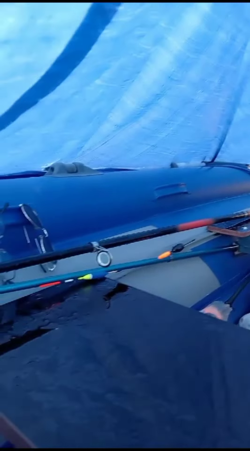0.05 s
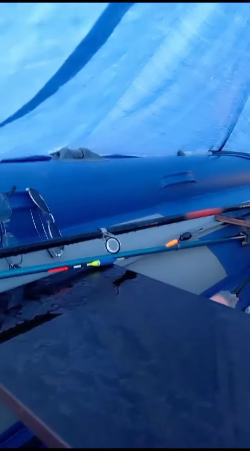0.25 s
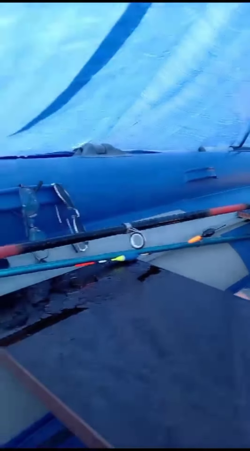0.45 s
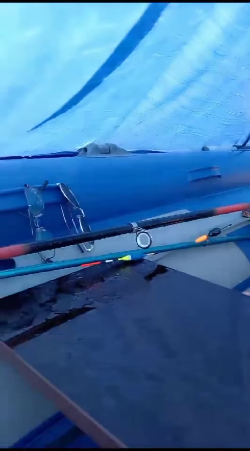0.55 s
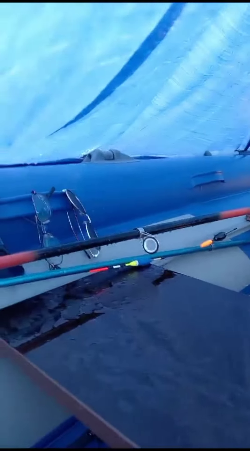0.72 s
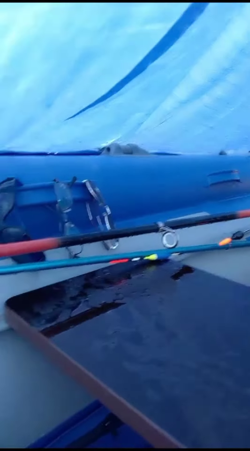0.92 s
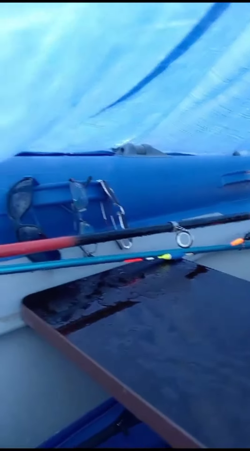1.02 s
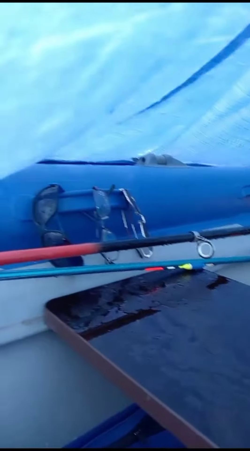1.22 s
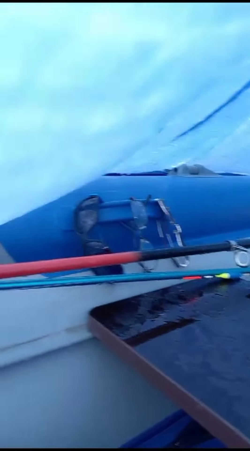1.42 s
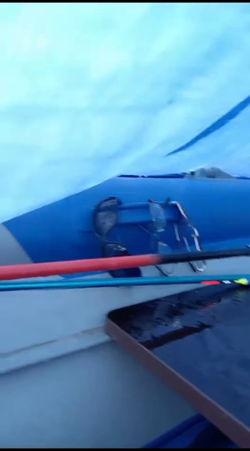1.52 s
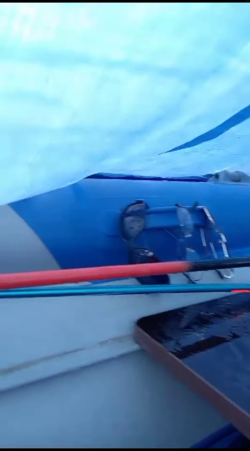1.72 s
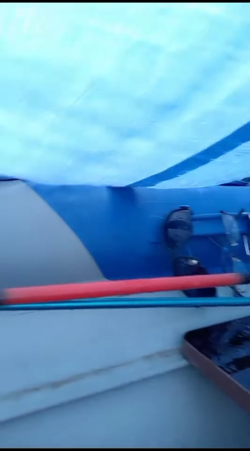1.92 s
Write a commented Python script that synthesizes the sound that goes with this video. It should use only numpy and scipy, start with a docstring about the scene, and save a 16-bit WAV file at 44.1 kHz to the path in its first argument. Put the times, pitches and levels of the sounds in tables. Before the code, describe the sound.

A tarp canopy flaps over a small boat, heard from underneath. It stirs with soft slaps, then flutters and pulls taut with a loud, low thump near 0.3 seconds. Three quick ringing blows follow around 0.4. It drums and rustles with fine rain crackle, the drumming sinking after 1 second. Creases snap near 0.85, 1.4 and 1.9 seconds, with tiny bright ticks. Faint wind and distant rain continue throughout.

```python
"""Under a tarp canopy on a small boat, with low wind and distant rain throughout. The sheet stirs with
soft slaps, then a gust fills it: it flutters and slaps taut with a low thump at 0.27 s. Three blows of
the gust set it ringing, and it drums and rustles as it shifts, fine rain crackling on the fabric.
After about 1 s the drumming sinks; the rustle goes on, with bright ticks and the sharp snaps of
creases flipping over."""
import sys
import numpy as np
from scipy import signal
from scipy.fft import rfft, irfft
from scipy.io import wavfile
from scipy.ndimage import uniform_filter1d

SR = 44100
rng = np.random.default_rng(int(sys.argv[2]) if len(sys.argv) > 2 else 0)


def dump_mix(stems):
    """Bounce the given channels to the path in sys.argv[1] as a 16-bit WAV at rate SR."""
    frames = np.atleast_2d(stems).T  # one column per channel
    limited = np.clip(frames, -1, 1)  # hard clip at full scale
    pcm = np.round(limited * 32767).astype(np.int16)
    wavfile.write(sys.argv[1], SR, pcm)


N = 85995


def undb(db):
    """Decibels to gain."""
    return 10 ** (np.asarray(db) / 20)


def unit(x):
    """Scale to rms 1."""
    return x / np.sqrt(np.mean(x ** 2) + 1e-20)


def clock():
    """Time of each sample in seconds."""
    return np.arange(N) / SR


def envelope(points):
    """Gain curve through (t/s, level/dB) points."""
    return undb(np.interp(clock(), *np.array(points).T))


def eq(x, points):
    """Minimum-phase EQ through (f/Hz, level/dB) points."""
    size = 4096
    hz, db = np.array(points, float).T
    bin_hz = np.arange(size // 2 + 1) * SR / size
    bin_db = np.interp(np.log(bin_hz + 1), np.log(hz), db)
    cepstrum = irfft(np.log(undb(bin_db)))
    cepstrum[1:size // 2] *= 2
    cepstrum[size // 2 + 1:] = 0
    impulse_response = irfft(np.exp(rfft(cepstrum)))
    return signal.fftconvolve(x, impulse_response)[:N]


def highpass(order, hz):
    """Sections of a Butterworth low cut."""
    return signal.butter(order, hz, "high", fs=SR, output="sos")


def shelf(x, hz, db):
    """Boost or cut everything above a frequency."""
    return x + (undb(db) - 1) * signal.sosfiltfilt(highpass(2, hz), x)


def band(x, hz, width_hz):
    """One resonance, gain 1 at its centre."""
    return signal.lfilter(*signal.iirpeak(hz, hz / width_hz, fs=SR), x)


def wander(rate):
    """Smooth random modulation, rms 1."""
    steps = rng.standard_normal(2000)
    return unit(np.interp(clock() * rate, np.arange(len(steps)), steps))


def patter(rate, scatter_db):
    """Tiny impacts of uneven size at random moments, about `rate` a second."""
    hits = rng.random(N) < rate / SR
    size = undb(scatter_db * np.minimum(rng.standard_normal(N), 2))
    sign = rng.choice([-1, 1], N)
    return unit(hits * sign * size)


# Slap cues, the sheet pulling taut: t/s, level/dB, f/Hz, softness/s
SLAP_CUES = [(0.017, -36, 127, 0.0025), (.036, -46, 90, .002), (.099, -43, 103, 0.0018),
             (.126, -36, 105, 0.00054), (0.138, -32.5, 121, 0.00042), (0.147, -34.5, 99, 0.0005),
             (.180, -50, 130, .0015), (0.211, -32, 79, .0015), (.236, -25, 84, 0.0033),
             (0.248, -27, 95, .0022), (0.2568, -13.5, 138, 0.00051), (0.2703, -8, 103, 0.00081),
             (0.277, -14.5, 209, 0.00028), (.2830, -12.5, 63, 0.0019), (1.173, -53, 110, 0.00074),
             (1.488, -35.5, 88.5, 0.0015)]


def slaps():
    """Pressure builds under the sheet and collapses as it cracks taut; the sheet swings once."""
    fill_cycles, swing_cycles, swing_lag_rad, crack_share = 0.6, 0.75, 0.76, 0.2
    out = np.zeros(N)
    for start, db, hz, soft_s in SLAP_CUES:
        age = clock() - start
        after = np.maximum(age, 0)
        pull = 0.5 + 0.5 * np.tanh(age / soft_s)
        crack = 1 - np.exp(-after / soft_s)
        taut = (1 - crack_share) * pull + crack_share * crack
        fill = np.exp(np.minimum(age, 0) * hz / fill_cycles)
        damping = np.exp(-(after * hz / swing_cycles) ** 2)
        swing = -damping * np.cos(2 * np.pi * hz * after - swing_lag_rad)
        thump = signal.sosfiltfilt(highpass(1, 25), (1 - taut) * fill + taut * swing)
        out += undb(db) * thump / np.abs(thump).max()
    return out


# Beat cues, the gust hitting the taut sheet: t/s, level/dB
BEAT_CUES = [(.391, -15), (.419, -20), (0.463, -35)]
# The ring of each beat: f/Hz, width/Hz, relative level/dB
BEAT_RING = [(164.3, 33, -1.5), (234.7, 43, 3), (294.6, 42, 0.5), (643, 59, -5.5), (689, 54, -11)]


def beats():
    """Single blows of the gust set the taut sheet ringing; the ring swells quickly and dies away."""
    out = np.zeros(N)
    for start, db in BEAT_CUES:
        age = np.maximum(clock() - start, 0)
        tone = np.zeros(N)
        for hz, width, mode_db in BEAT_RING:
            swell = age * width * np.exp(-np.pi * width * age)
            tone += undb(mode_db) * swell * np.sin(2 * np.pi * hz * age)
        out += undb(db) * tone / np.abs(tone).max()
    return out


def sheet_ring(impacts, modes):
    """Impacts ring the sheet's steep resonances; the wind's steady pull keeps the ringing fairly even."""
    body = np.zeros(N)
    for k, (hz, width, db) in enumerate(modes):
        staggered = np.roll(impacts, 97 * k)
        first_pass = band(staggered, hz, 1.75 * width)
        body += undb(db) * band(first_pass, hz, 1.72 * width)
    body = unit(body)
    power = uniform_filter1d(body ** 2, size=1800)
    return unit(body / np.sqrt(power + 0.22))  # gentle compression


# Envelopes of the sheet's deep billow, low drum and hollow mids: t/s, relative level/dB
BILLOW_ENVELOPE = [(0.3, -35), (0.318, -56), (0.35, -53), (0.542, -34), (0.64, -44), (0.686, -60),
                   (0.782, -40.5), (0.818, -42.5), (0.892, -39.5), (1.066, -82), (1.176, -52), (1.228, -75),
                   (1.278, -48.5), (1.466, -62), (1.494, -63), (1.54, -74), (1.806, -53.5), (1.95, -68)]
DRUM_ENVELOPE = [(.3, -42), (.322, -36), (.368, -40), (.40, -34), (.45, -34.5), (.51, -30.5), (.626, -36),
                 (.68, -46.5), (.8, -43), (.842, -33.5), (.924, -36.5), (1.048, -62.5), (1.22, -55.5),
                 (1.27, -49), (1.388, -46.5), (1.434, -52), (1.485, -42), (1.525, -60), (1.62, -65),
                 (1.72, -53), (1.81, -53.5), (1.91, -49), (1.95, -56)]
HOLLOW_ENVELOPE = [(0.3, -38.5), (0.378, -44), (0.396, -38), (0.46, -30), (0.474, -39), (0.552, -34.5),
                   (0.708, -53.5), (0.736, -44), (0.804, -55), (0.842, -34), (0.914, -56), (1.02, -46.5),
                   (1.034, -52.5), (1.19, -60.5), (1.48, -45.5), (1.558, -68), (1.664, -63.5), (1.95, -67)]
# Resonances of the same three layers: f/Hz, nominal width/Hz, relative level/dB
BILLOW_RING = [(73, 9.8, -3), (91.7, 25.5, 1)]
DRUM_RING = [(157.2, 53, 0), (208.5, 36, -6), (243.5, 34, -1.5), (307, 40.4, -2), (369.6, 45, 1)]
HOLLOW_RING = [(563, 73, -3), (636.6, 26, -1.5), (701, 42, -4), (833, 125, -11.5)]


def drumming():
    """The gust sets the sheet moving: it billows and drums in its low and middle resonances."""
    gust_s, rise_s = 0.2924, 0.06
    fade_in = np.clip((clock() - gust_s) / rise_s, 0, 1)
    billow = sheet_ring(patter(rate=600, scatter_db=8), BILLOW_RING) * envelope(BILLOW_ENVELOPE)
    drum = sheet_ring(patter(rate=700, scatter_db=1), DRUM_RING) * envelope(DRUM_ENVELOPE)
    hollow = sheet_ring(patter(rate=900, scatter_db=3), HOLLOW_RING) * envelope(HOLLOW_ENVELOPE)
    return fade_in * (billow + drum * undb(0.5) + hollow * undb(-2.5))


# Envelope of the rustle: t/s, relative level/dB
RUSTLE_ENVELOPE = [(.285, -76.5), (.313, -51.5), (.40, -42.5), (.48, -44), (.55, -40.5), (.63, -44),
                   (.69, -47.5), (.76, -44.5), (.80, -45), (.845, -41), (.885, -39), (.92, -43),
                   (1.01, -44.5), (1.04, -50.5), (1.16, -52.5), (1.26, -48), (1.33, -47), (1.37, -42),
                   (1.41, -42), (1.44, -46), (1.485, -40.5), (1.51, -45), (1.53, -56), (1.6, -55.5),
                   (1.73, -47), (1.81, -51.5), (1.85, -47), (1.885, -43.5), (1.91, -45.5), (1.95, -54)]
# EQ of the fine crackle and of the coarse creases: f/Hz, relative level/dB
FINE_EQ = [(30, -52), (200, -11), (500, 2), (1000, 5), (2000, -3), (3000, -5), (4200, -4), (5500, -1.5),
           (6700, 2.5), (9000, -12), (16000, -19.5)]
CREASE_EQ = [(30, -56), (200, -16.5), (500, 5.5), (800, 4), (1800, 3), (3000, 1.5), (4200, -7),
             (6500, -5.5), (9000, -15), (16000, -8.5)]


def rustle():
    """Dense fine crackle of rain and fabric, with sparser, coarser ticks of creases."""
    brighten_db_per_s, sheen_fade_db_per_s, sheen_neutral_db = 7, 9.5, -57.5
    fine = unit(eq(patter(rate=13000, scatter_db=3), FINE_EQ))
    fine *= undb(-2.5 + 1.65 * wander(rate=90))
    coarse = unit(eq(patter(rate=1600, scatter_db=3), CREASE_EQ))
    coarse *= undb(-4 + 0.6 * wander(rate=50))
    strength = envelope(RUSTLE_ENVELOPE)
    ramp_s = clock() - 1
    thinned = shelf((fine + coarse) * strength, hz=4500, db=brighten_db_per_s * ramp_s)
    # The top sheen fades over time and is a touch duller in the lulls.
    sheen_db = 0.02 * (20 * np.log10(strength) - sheen_neutral_db) - sheen_fade_db_per_s * ramp_s
    return shelf(thinned, hz=8000, db=sheen_db)


# Snap cues of the creases: t/s, level/dB, f/Hz, decay/s
SNAP_CUES = [(0.546, -42, 1820, 0.0083), (0.846, -30.5, 1800, 0.0027), (0.853, -34.5, 2560, 0.0014),
             (.8585, -31.5, 3930, 0.00089), (.868, -32, 1890, 0.0029), (.875, -37, 3000, 0.0018),
             (0.8836, -31, 2260, 0.0024), (1.07, -44.5, 4800, 0.0026), (1.262, -40, 2870, 0.0012),
             (1.282, -40.5, 6640, 0.00096), (1.360, -35.5, 5850, 0.0046), (1.370, -28.5, 6140, 0.0074),
             (1.405, -40, 5800, 0.017), (1.86, -35.5, 3150, .005), (1.879, -41.5, 2980, 0.0034),
             (1.892, -40, 3200, 0.0069), (1.932, -35, 6250, 0.0072), (1.938, -36.5, 5100, 0.009)]
# EQ of a snap's crackle: f/Hz, relative level/dB
SNAP_EQ = [(30, -36), (300, -22), (1500, 4.5), (3000, 8), (6500, -2), (9000, -2), (16000, 5.5)]


def snaps():
    """A crease flips over: a short burst of crackle with its own ring, duller above that ring."""
    out = np.zeros(N)
    for start, db, hz, decay_s in SNAP_CUES:
        age = clock() - start
        crackle = patter(rate=17000, scatter_db=1.5)
        bite = unit(shelf(eq(crackle, SNAP_EQ), 1.2 * hz, db=-5))
        ring = unit(band(crackle, hz, width_hz=660)) * undb(0.5)
        attack_s = 0.67 * decay_s
        burst = np.exp(np.minimum(age / attack_s, -age / decay_s))
        out += undb(db) * unit(bite + ring) * burst
    return out


# Dark EQ of the flutter: f/Hz, relative level/dB
FLUTTER_EQ = [(60, 0), (200, 4.5), (550, -2), (900, -25), (1500, -20.5), (2500, -38), (6000, -50)]


def flutter():
    """A short dull flurry as the gust catches the slack sheet, just ahead of the big slap."""
    peak_s, spread_s = 0.2556, 0.0061
    swell = np.exp(-0.5 * ((clock() - peak_s) / spread_s) ** 2)
    flurry = unit(eq(patter(rate=3300, scatter_db=4.5), FLUTTER_EQ))
    return flurry * swell * undb(-28.5)


# Tick cues on the fabric: t/s, level/dB, attack and decay/s
TICK_CUES = [(0.995, -43, 0.0045), (1.148, -53, .005), (1.367, -36, 0.0012)]


def ticks():
    """Drops and creases make tiny bright ticks on the fabric."""
    hiss = unit(signal.sosfilt(highpass(4, 9000), rng.standard_normal(N)))
    spikes = sum(undb(db) * np.exp(-np.abs(clock() - at) / fade_s) for at, db, fade_s in TICK_CUES)
    return hiss * spikes


# EQ of the low wind and of the distant rain: f/Hz, relative level/dB
WIND_EQ = [(30, -26.5), (55, -12), (90, 1), (200, -2.5), (400, -5.5), (1000, -24.5), (3000, -52.5)]
DRIZZLE_EQ = [(30, -37), (300, 3), (700, 0), (1300, -0.5), (2500, -7), (6000, -19.5), (7200, -28.5),
              (16000, -24)]


def weather():
    """A bed of soft wavering wind and steady distant rain outside the canopy."""
    wind = unit(eq(rng.standard_normal(N), WIND_EQ)) * undb(-58.5 + 0.8 * wander(rate=14))
    drizzle = unit(eq(rng.standard_normal(N), DRIZZLE_EQ)) * undb(-59.5)
    return wind + drizzle


def scene():
    """Mono mix of all sources, heard from under the tarp."""
    mix = slaps() + flutter() + beats() + drumming() + rustle() + snaps() + ticks() + weather()
    return mix[None]


# Tone of the microphone: f/Hz, level/dB
MIC_EQ = [(15, -20.5), (30, -4), (55, -2.5), (200, -1), (7000, 0.5), (7500, -4), (8200, -10),
          (11000, -14.5), (13700, -20.5), (15200, -11.5)]


def record(dry):
    """The microphone dulls the high treble and cuts the top."""
    top_hz = 15850
    dulled = np.array([eq(channel, MIC_EQ) for channel in dry])
    return signal.sosfilt(signal.ellip(10, 0.2, 80, top_hz, fs=SR, output="sos"), dulled)


dry = scene()
out = record(dry)
dump_mix(out)
```